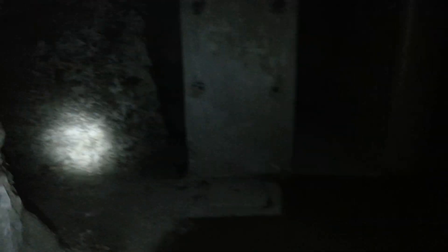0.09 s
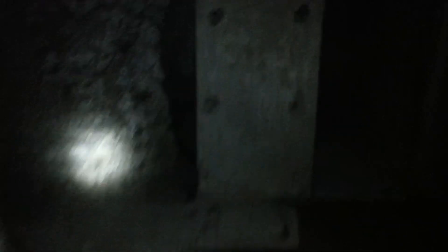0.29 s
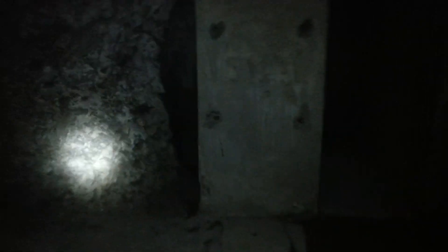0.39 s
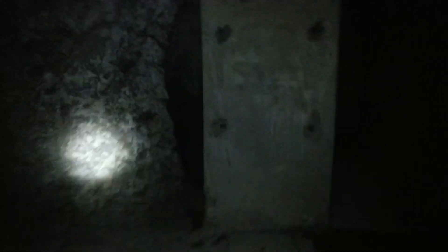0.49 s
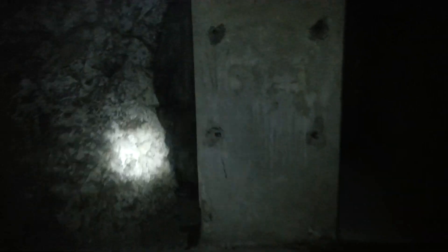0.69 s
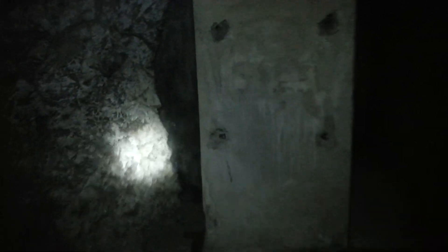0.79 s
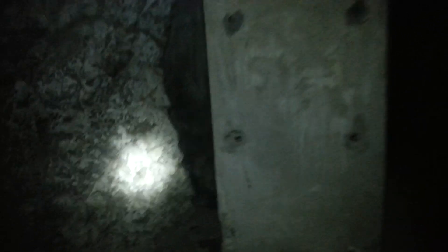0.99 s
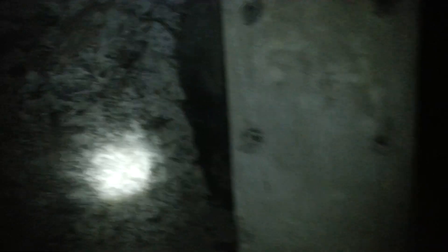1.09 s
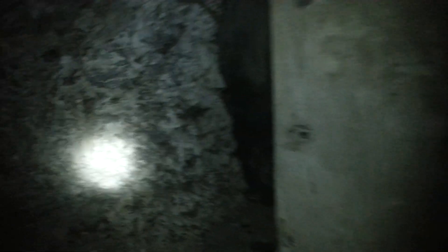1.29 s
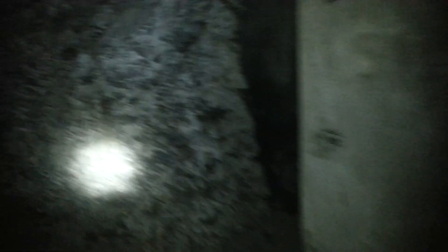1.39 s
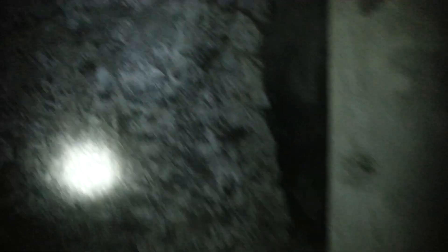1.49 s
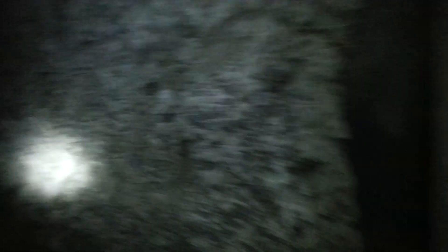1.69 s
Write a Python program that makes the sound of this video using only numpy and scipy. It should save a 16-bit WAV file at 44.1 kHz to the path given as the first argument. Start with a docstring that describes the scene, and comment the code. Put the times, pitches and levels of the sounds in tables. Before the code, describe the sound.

Close handheld stereo microphone in a rock tunnel: faint hiss and a fading earlier echo, a strong boot thud with gritty crunch, a brief stone knock, softer scrapes, then a faint start of another step.

```python
"""A faint hiss and the dying low echo of an earlier step, then walking on loose rock in a narrow tunnel,
heard from the walker's hand. A boot lands heel then sole (filtered impulses and short rumbles), grit
crunches (sparse random grains) and a stone clacks (decaying modes); the other boot scrapes forward and
the next step begins. The tunnel booms at its cross modes; its long, dull echo is decaying noise."""
import sys
import numpy as np
from scipy import signal
from scipy.fft import rfft, irfft
from scipy.io import wavfile

SR = 44100
rng = np.random.default_rng(int(sys.argv[2]) if len(sys.argv) > 2 else 0)


def bounce(signal):
    """Save signal as a 16-bit WAV file at the path given by the first command-line argument."""
    frames = np.transpose(np.atleast_2d(signal))
    limited = np.clip(frames, -1, 1)
    pcm = np.round(limited * 32767).astype(np.int16)
    wavfile.write(sys.argv[1], SR, pcm)


N = 74970

# spectrum of a boot on the ground: f/Hz, relative level/dB
BOOT_COLOUR = [(40, -51), (110, -25.5), (170, -12), (230, 1), (400, 1), (750, -4.5), (1300, -13.5),
               (2500, -32), (6000, -38.5), (15000, -96)]

# direct levels of the sources, added to the levels in their tables
BOOT_DB, SCUFF_DB, CHIP_DB, STONE_DB = 6.5, -5, 10.5, -1.5
# level of each source into the tunnel, relative to its direct sound
BOOT_WET_DB, SCUFF_WET_DB, CHIP_WET_DB, STONE_WET_DB = -1.5, 6, 1.5, 2
SETTLE_DB = 2.5  # energy of the settling rumble relative to the push
CRUMBLE_DB, CRUMBLE_S = 1, 0.005  # energy relative to the snap, decay time constant
STONE_CONTACT_S = 0.00029  # time constant of the ring's onset
GRAINS_PER_S, GRAIN_SPREAD_DB = 4000, 4.5  # mean rate; scale of the exponential spread in size
CATCH_DB, CATCH_S = 3, 0.004  # the sole catches and slips: standard deviation and spacing
BODY_LOW_HZ, BODY_HIGH_HZ, HISS_HZ = 303, 1690, 5220  # edges of the grinding body; start of the hiss
TILT_FROM_HZ = 100
AIR_DB, EARLIER_ECHO_DB, EARLIER_FADE_S = -48, -33.5, 0.17
CROSS_DB = -60  # gain from the blows to the cross modes
NEAR_WALLS_DB, NEAR_WALLS_S, FIRST_ECHO_S = 9.5, 0.014, 0.0019  # extra early scatter, its decay, onset
# a narrow resonance near 1.7 kHz, perhaps of the microphone housing, added to the echoes
NARROW_HZ, NARROW_WIDTH_HZ, NARROW_DB, NARROW_T60_S = 1735, 170, -12.5, 0.76
ALIKE_HZ = 546  # noise at the two microphones is alike below, unrelated above
PORT_LAG_S = 0.00003  # lag of the right microphone, cut to whole samples
TOP_HZ = 14400


def undb(db):
    """Level definition: 20 dB is a factor of ten in amplitude."""
    return 10 ** (np.asarray(db) / 20)


def unit(x):
    """Energy normalisation: the squares sum to one."""
    return x / np.sqrt(np.sum(x ** 2))


def freqs():
    """Discrete Fourier frequencies of the zero-padded signal, kept at 1 Hz or more."""
    return np.maximum(np.arange(N + 1) * SR / (2 * N), 1)


def along(points):
    """Logarithmic pitch scale: a table of (f/Hz, value) interpolated on log frequency."""
    hz, value = np.array(points, float).T
    return np.interp(np.log(freqs()), np.log(hz), value)


def octaves():
    """Spectral tilt: octaves above the bass, zero below it."""
    return np.log2(np.maximum(freqs() / TILT_FROM_HZ, 1))


def above(hz):
    """High-pass weighting: a smooth step from 0 to 1, one half at the given frequency."""
    return 1 / (1 + (hz / freqs()) ** 4)


def colour(x, db):
    """Minimum-phase filtering by folding the cepstrum; the power of white noise is kept."""
    gain = unit(undb(db)) * np.sqrt(N)
    cepstrum = irfft(np.log(gain))
    cepstrum[1:N] *= 2
    cepstrum[N + 1:] = 0
    response = np.exp(rfft(cepstrum))
    return irfft(rfft(x, 2 * N) * response)[..., :N]


def place(x, start):
    """Pure delay: the sound begins at its start time."""
    return np.pad(x, (max(int(start * SR), 0), 0))[:N]


def decay(t, t60):
    """Exponential damping: amplitude falls by 60 dB in t60 seconds."""
    return np.exp(-np.log(1000) * t / t60)


def modal_ring(modes, t):
    """Modal superposition: damped cosines given as (f/Hz, level/dB, t60/s)."""
    return sum(undb(db) * np.cos(2 * np.pi * hz * t) * decay(t, t60) for hz, db, t60 in modes)


def pair():
    """Spatial coherence: noise at two close microphones agrees in the bass, not in the treble."""
    mid, side = rfft(rng.standard_normal((2, 2 * N)))
    alike = 1 - above(ALIKE_HZ)
    mid = mid * np.sqrt((1 + alike) / 2)
    side = side * np.sqrt((1 - alike) / 2)
    return irfft(np.array([mid + side, mid - side]))[:, :N]


def lean(x):
    """Interchannel level difference: the upper middle is stronger on the left."""
    # left over right: f/Hz, level difference/dB
    left_excess = [(300, 2.5), (800, 0), (1700, 5.5), (3800, 2.5), (7000, 1)]
    half = along(left_excess) / 2
    return irfft(rfft(x, 2 * N) * undb(np.array([half, -half])))[..., :N]


def air(t):
    """Stationary filtered noise as hiss, plus exponential decay of the earlier step's low echo."""
    # spectrum of the hiss: f/Hz, relative level/dB
    air_colour = [(25, -21), (60, -18), (120, -2.5), (300, -1.5), (600, -6), (1100, -3.5), (1700, -2.5),
                  (3000, -6), (4500, -8.5), (6500, -15), (14000, -18)]
    hiss = colour(pair(), along(air_colour))
    earlier = colour(pair(), along(BOOT_COLOUR)) * np.exp(-t / EARLIER_FADE_S)
    return undb(AIR_DB) * hiss + undb(EARLIER_ECHO_DB) * earlier


def tunnel(t):
    """Statistical reverberation: near-wall scatter and a long dull tail, with a narrow resonance added."""
    # tunnel decay: f/Hz, t60/s
    tunnel_decay = [(150, 1.83), (400, 1.306), (1000, 0.95), (2000, 0.59), (4000, 0.8), (8000, 0.72),
                    (14000, 0.069)]
    bands = []
    for centre, t60 in tunnel_decay:
        # triangular band: 1 at its centre, 0 at the neighbouring centres
        bands.append((along([(hz, hz == centre) for hz, _ in tunnel_decay]), t60))
    narrow = np.exp(-((freqs() - NARROW_HZ) / NARROW_WIDTH_HZ) ** 2)
    bands.append((undb(NARROW_DB) * narrow, NARROW_T60_S))
    noise = rfft(pair(), 2 * N)
    tail = sum(irfft(noise * band)[:, :N] * decay(t, t60) for band, t60 in bands)
    scatter = 1 + undb(NEAR_WALLS_DB) * np.exp(-t / NEAR_WALLS_S)
    onset = np.minimum(t / FIRST_ECHO_S, 1) ** 2
    return unit(tail * scatter * onset)


def echoes(sounds, t, count):
    """Path diversity by convolution: the feet move, so sounds take different tunnel paths in turn."""
    out = 0
    for k in range(count):
        sent = sum(sounds[k::count])
        out = out + signal.fftconvolve(sent[None], tunnel(t), axes=1)[:, :N]
    return out


def boom(x, t):
    """Modal resonance: the blows set the air ringing at the cross modes of the tunnel."""
    # cross modes, the lowest between floor and roof, the others between the walls: f/Hz
    cross_hz = (171.8, 220.4, 336, 446.6, 558.6, 663.8)
    # ring of each of these modes: relative level/dB, t60/s
    cross_ring = [(0, 0.85), (2, 1.), (-5.5, 0.26), (6, 0.25), (-5, 0.26), (1.5, 0.52)]
    modes = [(hz, db, t60) for hz, (db, t60) in zip(cross_hz, cross_ring)]
    return undb(CROSS_DB) * signal.fftconvolve(x, modal_ring(modes, t))[:N]


def stone(t):
    """Impact excitation of damped modes: a stone tips, knocks and chatters, damped by the boot."""
    # a loose stone knocking on rock: t/s, relative level/dB
    knocks = [(.5301, 0), (0.5338, -11), (0.544, -10.5)]
    # its modes: f/Hz, relative level/dB, t60/s
    stone_modes = [(1675, -0.5, 0.0077), (1950, 1.5, 0.006), (2345, -1.5, 0.0059), (4220, -12, 0.0084)]
    ring = modal_ring(stone_modes, t) * (1 - np.exp(-t / STONE_CONTACT_S))
    band = signal.butter(3, (1290, 5700), "bandpass", fs=SR, output="sos")
    ring = signal.sosfilt(band, ring)
    return [undb(db + STONE_DB) * place(ring, start) for start, db in knocks]


def chips(t):
    """Brittle fracture: an impulse as rock snaps, then decaying noise as its pieces crumble."""
    # chips snapping under the boot: t/s, relative level/dB, brightness/(dB per octave)
    snaps = [(.0458, -19.5, -2.5), (0.0543, -21, -6.5), (0.264, -20, -2), (.2808, -16, -7),
             (0.289, -19.5, -0.5), (0.3048, -22, -4.5), (0.3415, -22.5, 9), (0.384, -18.5, -4.5),
             (0.4664, -12.5, -0.5), (.474, -15.5, -5.5), (0.6584, -19, 3), (0.914, -16, -3),
             (0.9206, -15, 0), (1.031, -17.5, -11), (1.638, -23, -6.5), (1.685, -21.5, 2.5)]
    # spectrum of a chip: f/Hz, relative level/dB
    chip_colour = [(100, -61.5), (600, -15.5), (1200, -4), (1700, 8), (2300, 0.5), (3300, 5.5), (4600, -2),
                   (6000, -11), (14000, -43)]
    out = []
    for start, db, bright_db in snaps:
        crumble = unit(rng.standard_normal(N) * np.exp(-t / CRUMBLE_S))
        snap = (t == 0) + undb(CRUMBLE_DB) * crumble
        tone = along(chip_colour) + bright_db * octaves()
        out.append(undb(db + CHIP_DB) * place(colour(snap, tone), start))
    return out


def catches(t):
    """Stick-slip friction: the uneven grip of a sliding sole as a random gain."""
    return undb(CATCH_DB * np.interp(t / CATCH_S, np.arange(N), rng.standard_normal(N)))


def scuffs(t):
    """Shot noise of tiny grit fractures; weight adds a grinding body, a quick slide adds hiss."""
    # the sole on grit: start t/s, attack/s, hold/s, release/s, relative level/dB, body/dB, hiss/dB
    slides = [(-.03, 0.0079, 0.046, 0.026, -36, -6, -7), (0.216, 0.00091, 0.0082, 0.031, -22.5, 5.5, 0),
              (0.286, 0.011, 0.0048, 0.03, -21.5, 16.5, 12.5),
              (0.366, 0.048, 0.013, 0.016, -26, -11, -14.5), (0.45, 0.014, 0.021, 0.0053, -22.5, 1, -2),
              (0.634, 0.019, 0.015, 0.055, -39.5, -2, 14), (0.793, 0.0092, 0.023, 0.02, -37, 0, -3),
              (0.849, 0.001, 0.0085, 0.011, -25.5, -7, -25), (0.859, 0.05, 0.013, 0.064, -21.5, 2, 2),
              (0.964, 0.0065, 0.008, 0.011, -28, -1, -5), (1.02, 0.0055, 0.018, 0.023, -25, 9, -33),
              (1.057, 0.005, 0.054, 0.035, -32, -4, -9), (1.44, 0.065, 0.025, 0.065, -36.5, -5.5, -5.5),
              (1.595, 0.0058, 0.012, 0.013, -33.5, -8.5, -5), (1.631, 0.0064, 0.047, 0.0091, -33, -0.5, -7)]
    # spectrum of the grit: f/Hz, relative level/dB
    grit_colour = [(45, -47), (140, -17.5), (250, -5), (450, 0.5), (1050, -1), (1720, 2), (2150, -4),
                   (3100, -1.5), (4700, -5.5), (5700, -13.5), (9000, -16.5), (14000, -20.5)]
    body = above(BODY_LOW_HZ) * (1 - above(BODY_HIGH_HZ))
    out = []
    for start, attack, hold, release, db, body_db, hiss_db in slides:
        spread = np.minimum(rng.exponential(size=N), 4)
        sizes = rng.choice([-1, 1], N) * undb(GRAIN_SPREAD_DB * spread)
        fractures = rng.random(N) < GRAINS_PER_S / SR
        grains = unit(sizes * catches(t) * fractures) * np.sqrt(N)
        rise = np.clip((t - start) / max(attack, .001), 0, 1)
        fall = np.exp(-np.maximum(t - start - attack - hold, 0) / max(release, .002))
        tone = along(grit_colour) + body_db * body + hiss_db * above(HISS_HZ)
        out.append(undb(db + SCUFF_DB) * colour(grains * rise * fall, tone))
    return out


def boots(t):
    """Impulsive loading: each blow is a dull push and a short rumble as the ground settles."""
    # blows: t/s, relative level/dB, hardness/(dB per octave), settling time constant/s (1 ms or more)
    blows = [(0.014, -16, -4, 0.00086), (0.2231, -4.5, -2, 0.0028), (0.2264, 2, 0, 0.004),
             (0.236, 1.5, -0.5, 0.0076), (0.254, -2, -.5, 0.012), (0.2802, 3, 1, 0.0039),
             (0.2857, -3, -1.5, 0.0081), (0.2964, -5, -0.5, 0.012), (.667, -13.5, -3, 0.011),
             (1.018, -13.5, 2, 0.0046), (1.027, -13.5, 3.5, 0.012), (1.063, -20, 6.5, 0.002),
             (1.601, -20.5, 3, 0.016)]
    out = []
    for start, db, hard_db, settle in blows:
        rumble = unit(rng.standard_normal(N) * np.exp(-t / max(settle, .001)))
        push = (t == 0) + undb(SETTLE_DB) * rumble
        tone = along(BOOT_COLOUR) + hard_db * octaves()
        out.append(undb(db + BOOT_DB) * place(colour(push, tone), start))
    return out


def scene():
    """Superposition: every foot sound arrives directly and by way of the tunnel."""
    t = np.arange(N) / SR
    blows = boots(t)
    sources = [(blows, BOOT_WET_DB), (scuffs(t), SCUFF_WET_DB),
               (chips(t), CHIP_WET_DB), (stone(t), STONE_WET_DB)]
    direct = sum(sum(sounds) for sounds, _ in sources)
    sent = [undb(wet_db) * x for sounds, wet_db in sources for x in sounds]
    near = np.array([direct, place(direct, PORT_LAG_S)])
    return lean(near + echoes(sent, t, count=5) + boom(sum(blows), t) + air(t))


def record(dry):
    """Saturation and band-limiting: the recorder clips at full scale and cuts the top."""
    low_pass = signal.ellip(8, .2, 70, TOP_HZ, fs=SR, output="sos")
    return signal.sosfilt(low_pass, np.clip(dry, -1, 1))


dry = scene()
out = record(dry)
bounce(out)
```